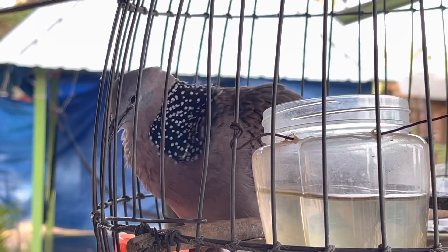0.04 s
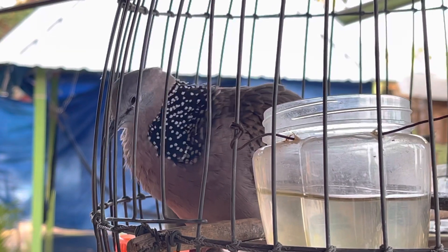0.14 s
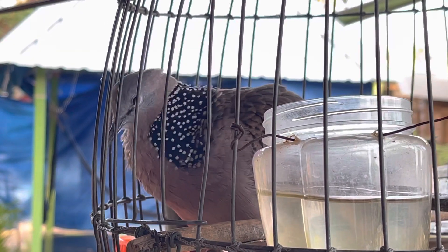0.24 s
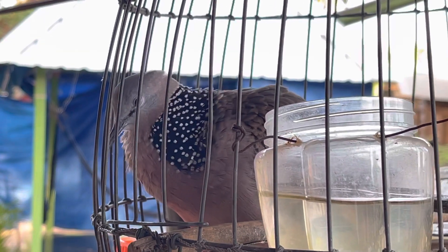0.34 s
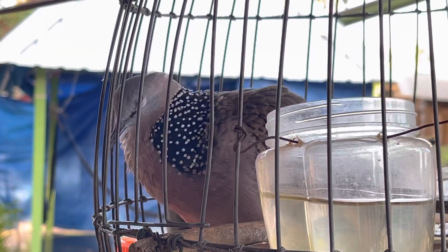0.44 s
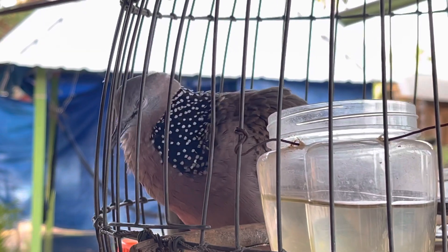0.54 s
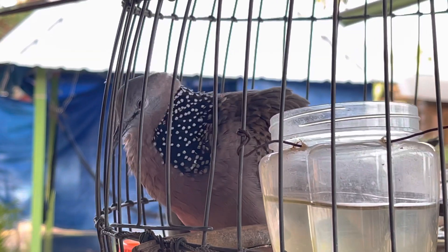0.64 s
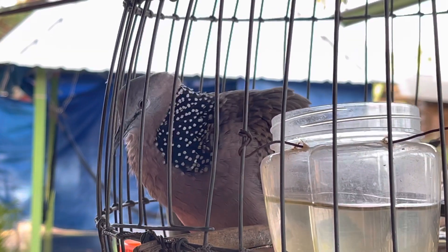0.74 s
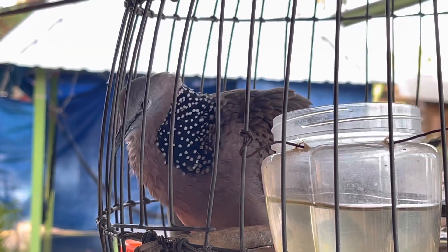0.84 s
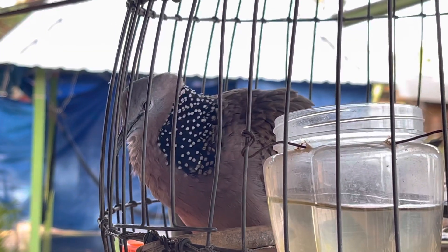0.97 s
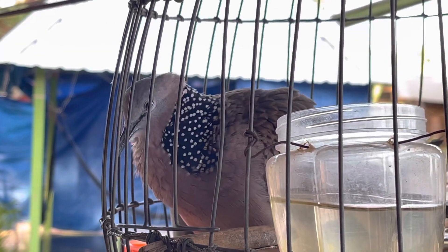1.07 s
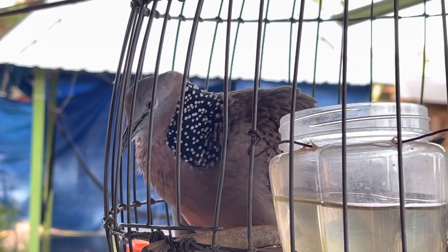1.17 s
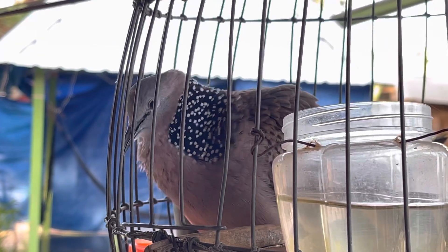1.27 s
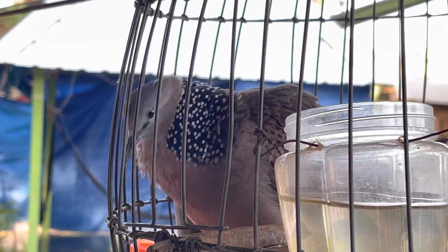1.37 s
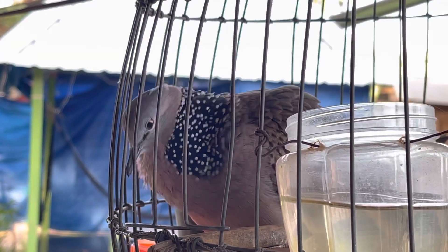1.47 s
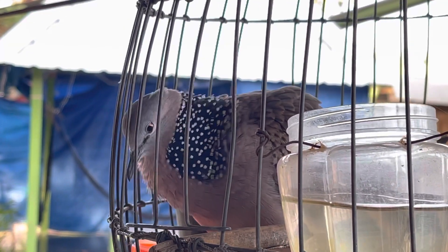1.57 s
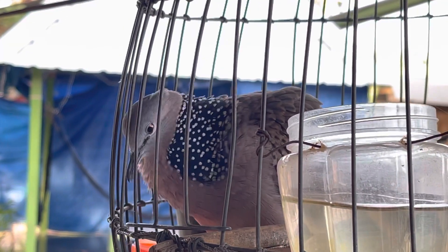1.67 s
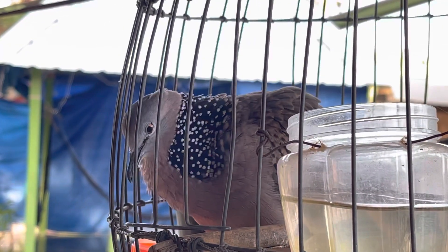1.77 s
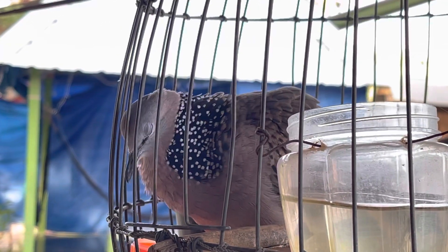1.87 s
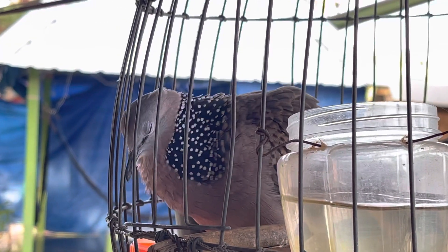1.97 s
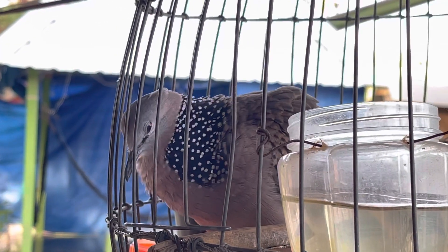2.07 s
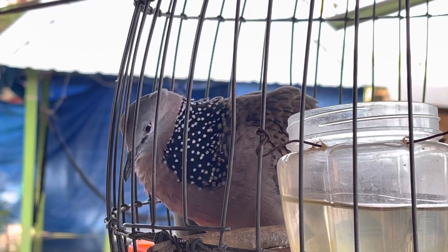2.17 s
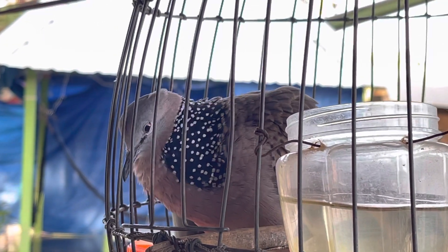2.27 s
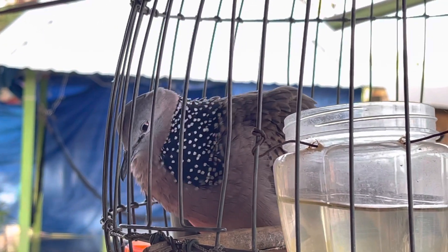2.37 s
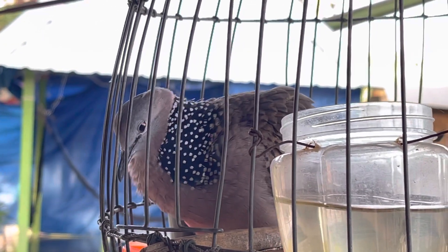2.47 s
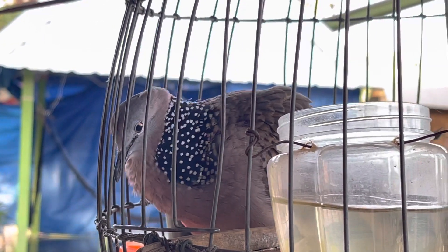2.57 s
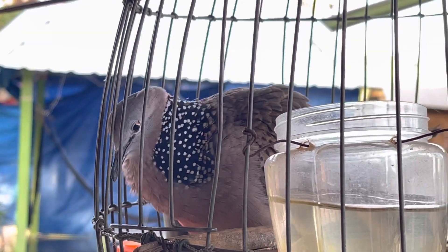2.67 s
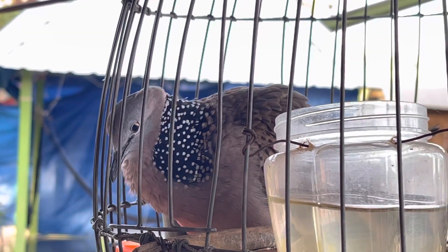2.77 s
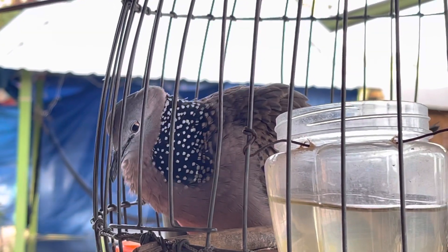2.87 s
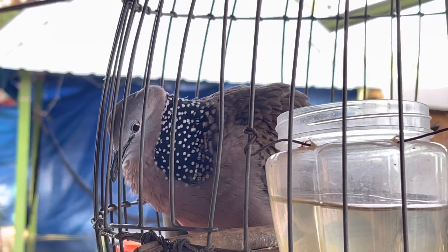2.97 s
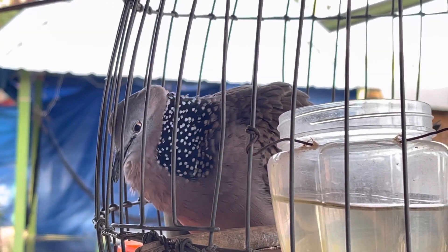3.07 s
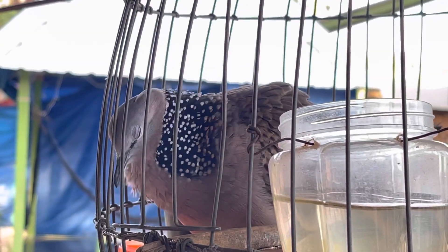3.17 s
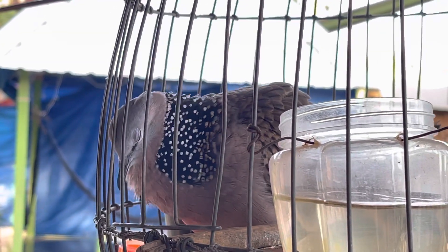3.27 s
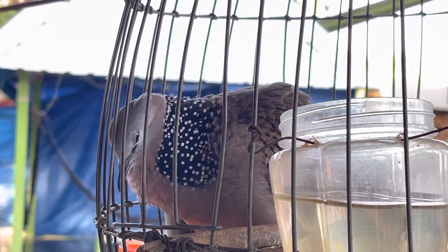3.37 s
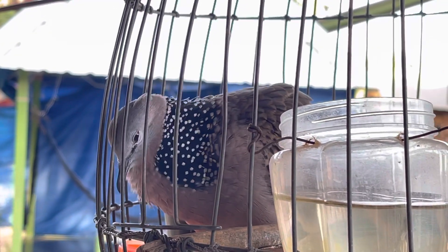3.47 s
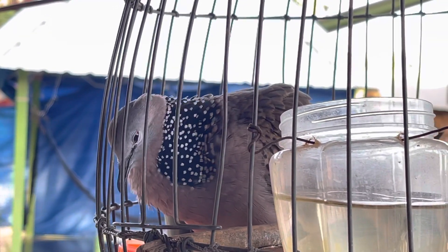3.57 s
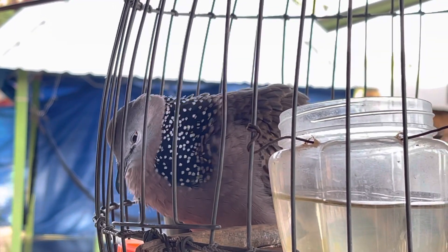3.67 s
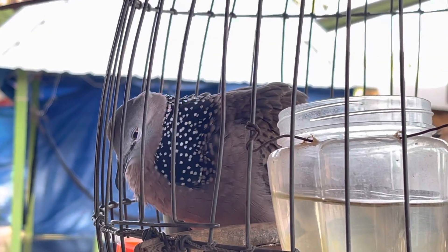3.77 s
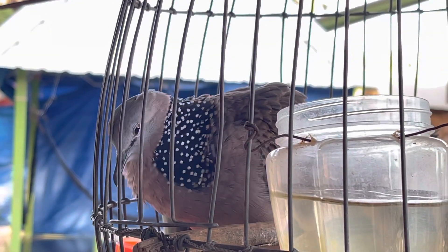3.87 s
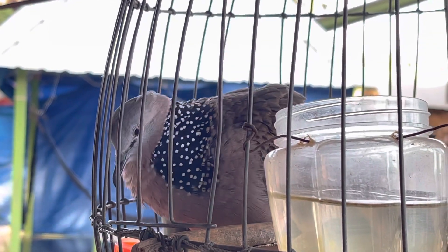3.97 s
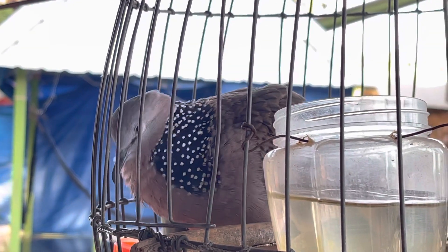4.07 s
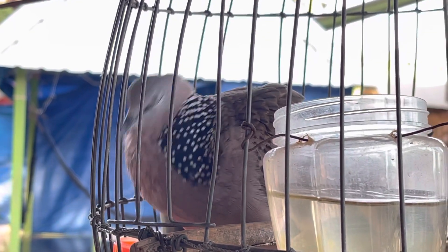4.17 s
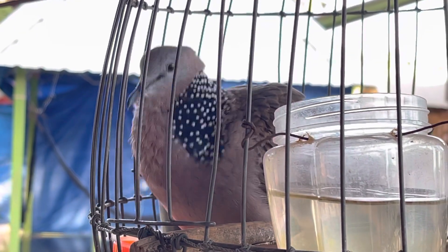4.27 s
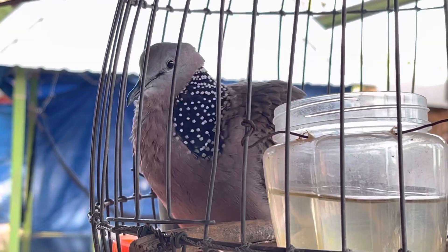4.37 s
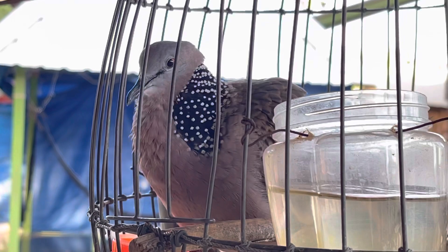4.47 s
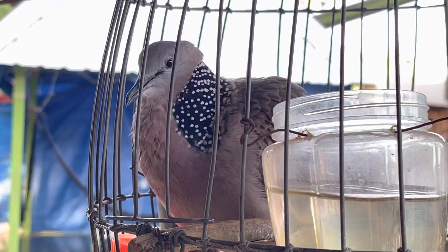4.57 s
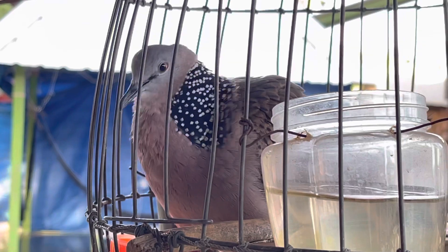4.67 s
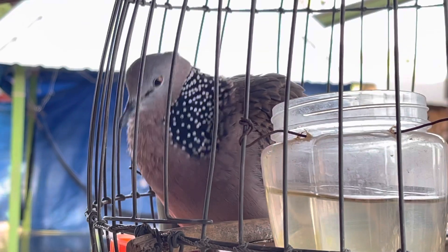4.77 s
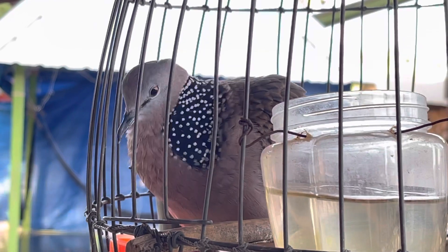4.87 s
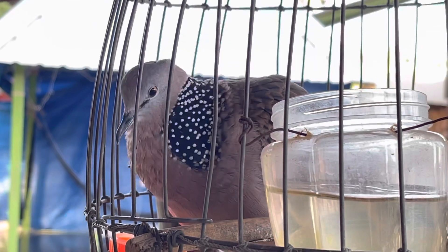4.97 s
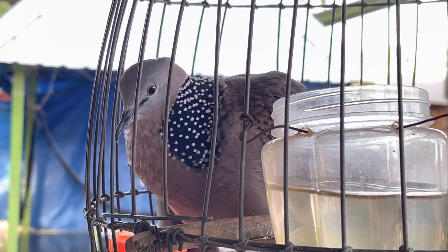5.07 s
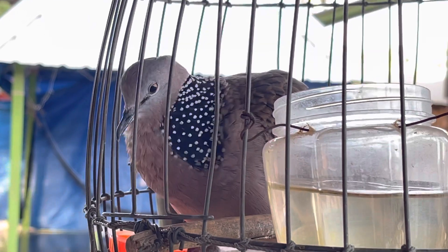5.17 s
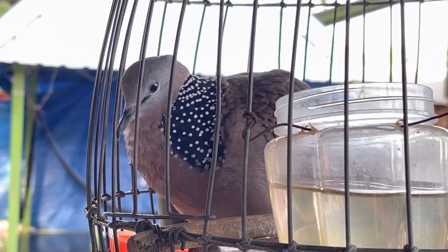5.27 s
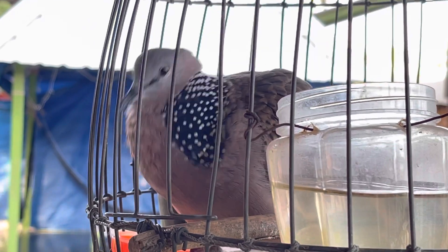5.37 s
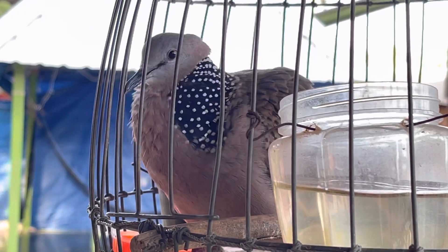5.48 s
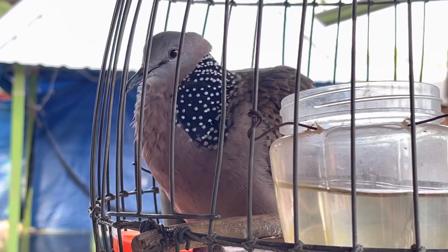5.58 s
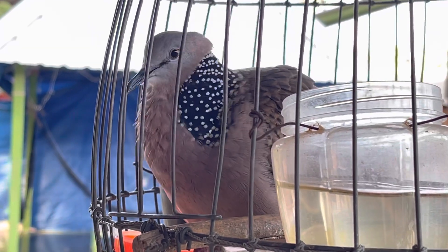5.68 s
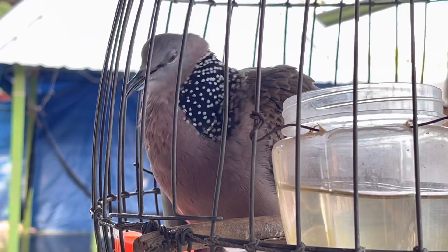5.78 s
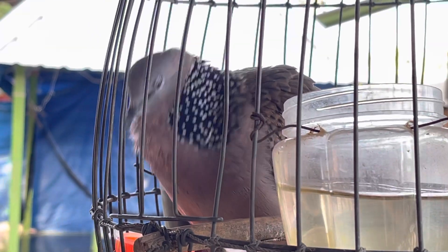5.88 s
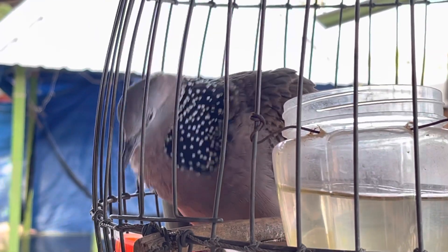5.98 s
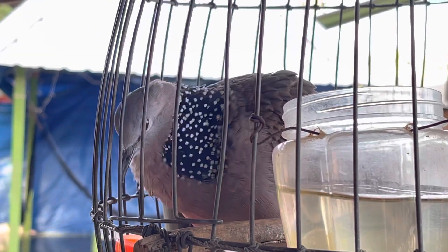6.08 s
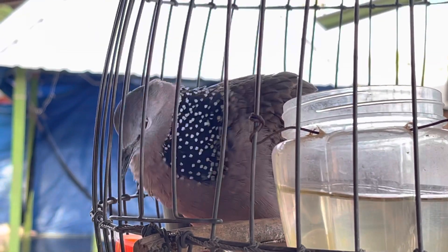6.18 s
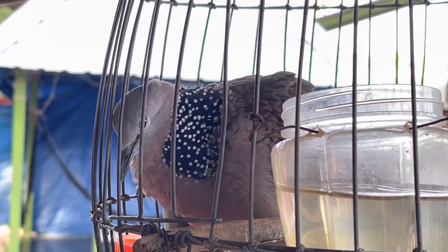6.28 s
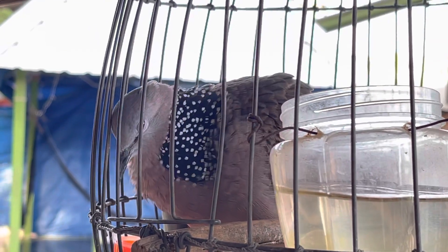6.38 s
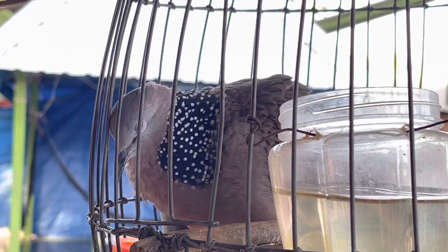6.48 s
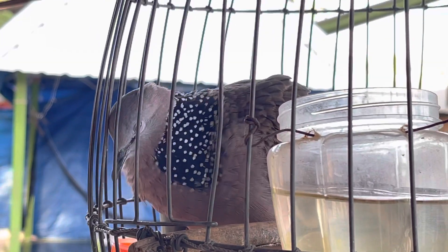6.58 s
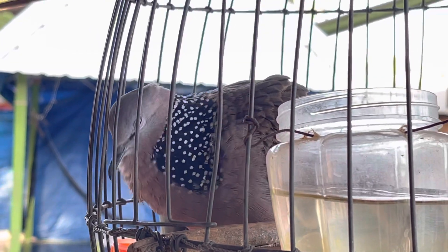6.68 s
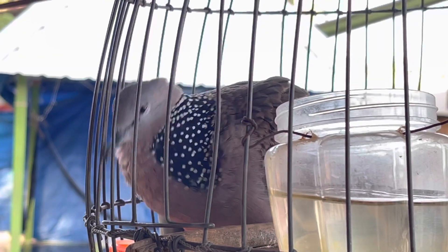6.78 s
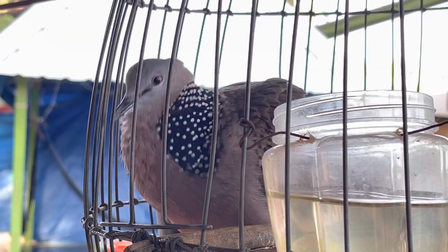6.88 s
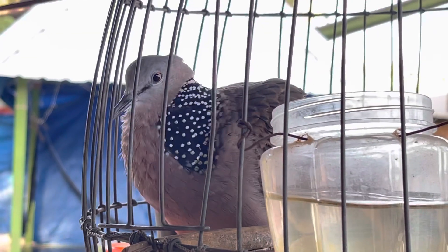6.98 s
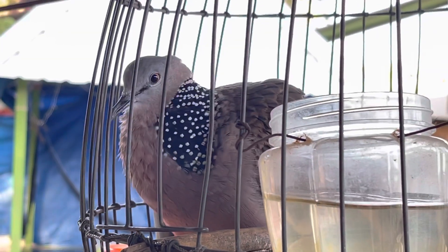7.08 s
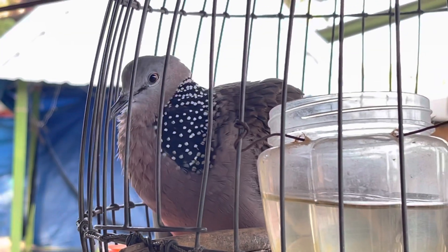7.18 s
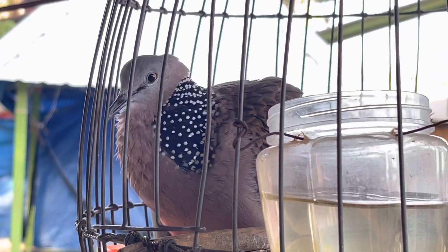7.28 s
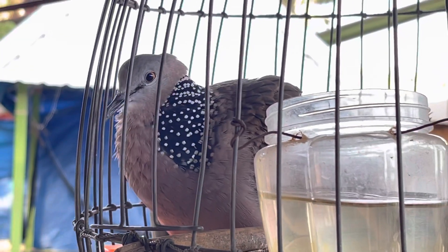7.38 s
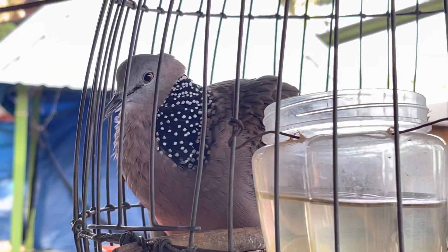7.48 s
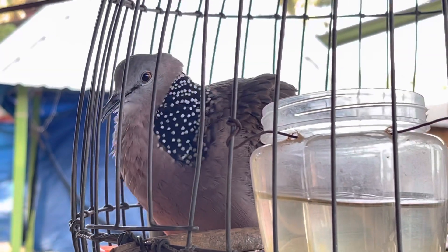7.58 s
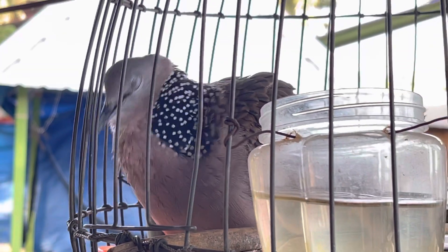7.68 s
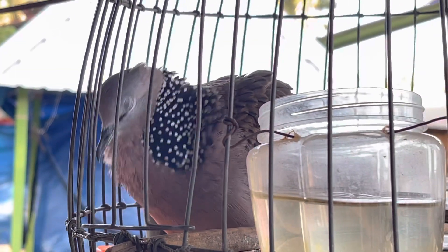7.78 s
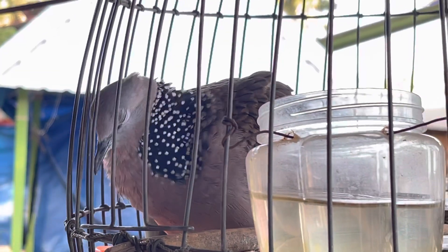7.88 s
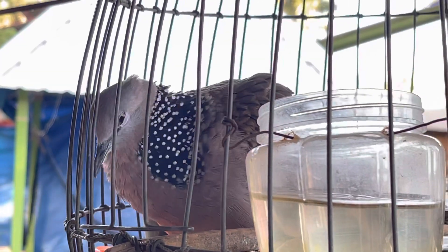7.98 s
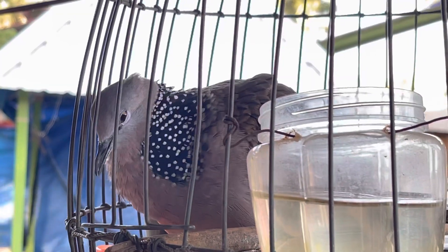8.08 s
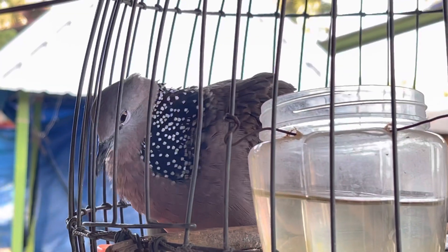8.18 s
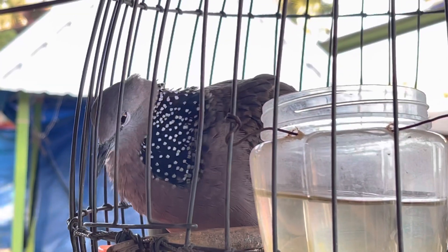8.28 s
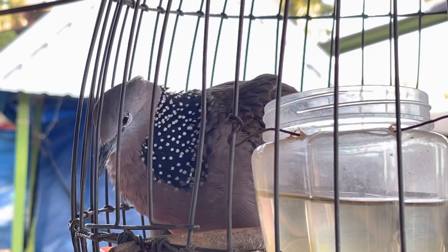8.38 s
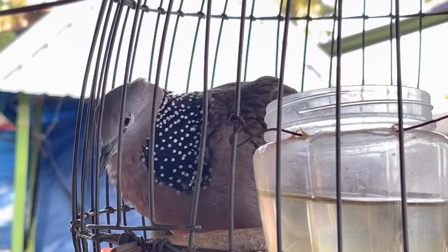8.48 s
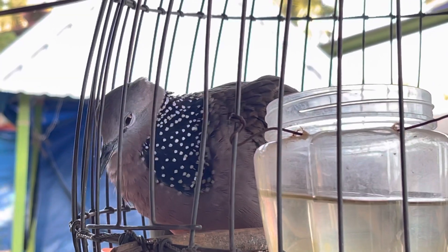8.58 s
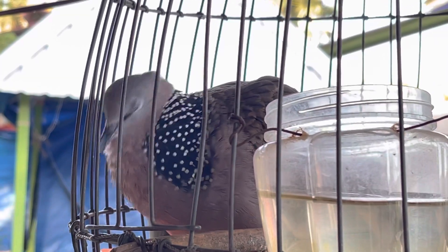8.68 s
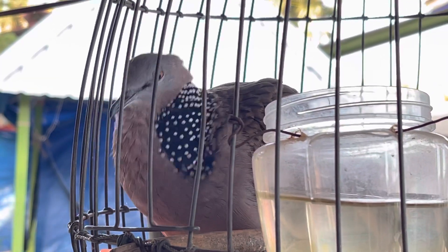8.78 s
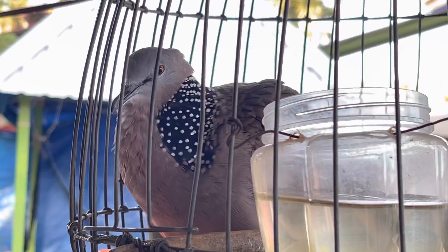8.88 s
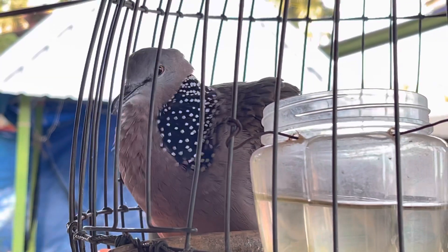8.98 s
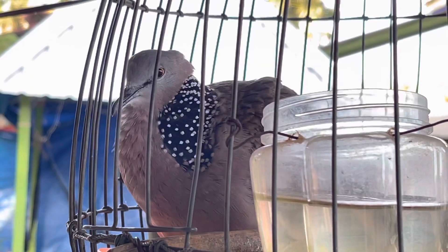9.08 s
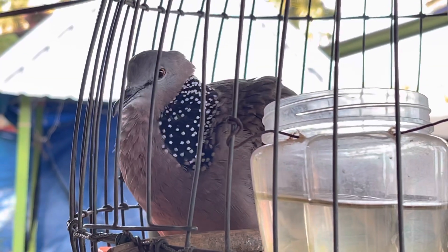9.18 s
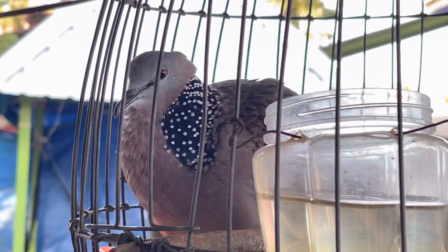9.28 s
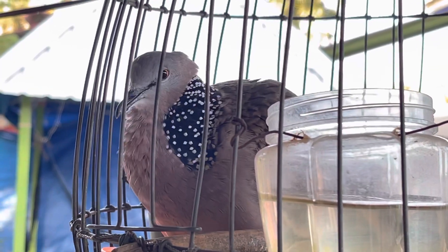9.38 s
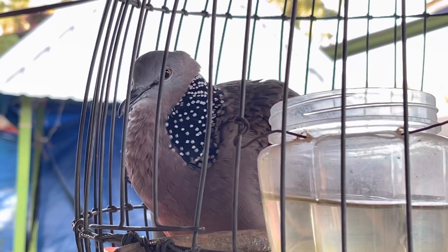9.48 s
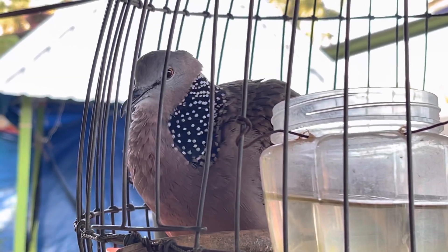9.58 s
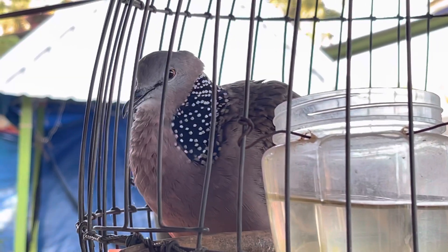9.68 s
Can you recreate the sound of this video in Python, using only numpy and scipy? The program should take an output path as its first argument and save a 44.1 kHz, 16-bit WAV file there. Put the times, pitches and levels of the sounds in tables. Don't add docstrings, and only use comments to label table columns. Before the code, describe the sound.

Throaty, fluttering dove coos repeat at close range outdoors, with soft leaf rustle, low engine rumble and a few dull wind thumps late on.

```python
import sys
import numpy as np
from scipy import signal
from scipy.fft import rfft, irfft, next_fast_len
from scipy.io import wavfile
from scipy.ndimage import uniform_filter1d

SR = 44100
rng = np.random.default_rng(int(sys.argv[2]) if len(sys.argv) > 2 else 0)


def log_audio(samples):
    frames = np.atleast_2d(samples).T
    limited = np.clip(frames, -1, 1)
    pcm = np.round(limited * 32767).astype(np.int16)
    wavfile.write(sys.argv[1], SR, pcm)


def gain_from_decibels(decibels):
    exponent = np.asarray(decibels, float) / 20
    return 10 ** exponent


N = 429534
T = np.arange(N) / SR
HZ = np.maximum(np.fft.rfftfreq(next_fast_len(N), 1 / SR), 1)

# (time [s], engine level [dB], wind level [dB])
RUMBLE = [(0.0, -52.5, -60), (2.2, -48.5, -59), (4.3, -53, -55), (5.5, -52, -57.5), (6.4, -50.5, -54.5),
          (7.3, -52.5, -41.5), (8.3, -52, -76), (8.7, -54, -48), (9.74, -48.5, -54.5)]


def on_hz(table, hz, axis=1):
    columns = np.array(table)
    return np.interp(np.log(hz), np.log(columns[:, 0]), columns[:, axis])


def curves(table):
    s, *columns = np.transpose(table)
    span = slice(int(max(s[0], 0) * SR), int(s[-1] * SR))
    return span, [np.interp(T[span], s, column) for column in columns]


def gains(table):
    return [gain_from_decibels(np.pad(db, (0, N - len(db)), "edge")) for db in curves(table)[1]]


def faded(x, s=.004):
    ramp = np.minimum(np.arange(len(x)), np.arange(len(x))[::-1]) / (s * SR)
    return x * np.minimum(ramp, 1)


def ring(x, hz, width_hz):
    r = np.exp(-np.pi * width_hz / SR)
    poles = [1, -2 * r * np.cos(2 * np.pi * hz / SR), r * r]
    return signal.lfilter([(1 - r * r) / 2, 0, (r * r - 1) / 2], poles, x)


def walk(rate):
    k = int(SR / rate)
    held = np.repeat(rng.standard_normal(N // k + 1), k)
    x = uniform_filter1d(uniform_filter1d(held, k), k)[:N]
    return x / x.std()


def wash(spectrum, flicker_db, rate, octaves):
    # (frequency [Hz], side minus mid [dB], share of side tied to mid [0-1], its lead [rad])
    ports = [(40, -11.5, .5, 2.0), (130, -11.5, .6, 2.8), (300, -9.5, .4, 2.5), (900, 1.5, .15, 1.5),
             (2500, -8, .5, 1.5), (4700, -11, .6, 1.5), (6200, -30, .7, 1.5), (8500, -14.5, .9, 1.5),
             (9300, -0.5, 0.93, 1.5), (10800, 3, 0.92, 1.5), (12000, -21.5, .95, 1.5)]
    size = next_fast_len(N)
    mid, other = rfft(rng.standard_normal((2, N)), size)
    like = np.clip(on_hz(ports, HZ, axis=2), 0, 1)
    tied = np.exp(1j * on_hz(ports, HZ, axis=3)) * like * mid
    side = gain_from_decibels(on_hz(ports, HZ)) * (tied + np.sqrt(1 - like ** 2) * other)
    inside = (HZ > spectrum[0][0]) & (HZ < spectrum[-1][0])
    pair = np.array([mid + side, mid - side]) * gain_from_decibels(on_hz(spectrum, HZ)) * inside
    band = (np.log2(HZ / spectrum[0][0]) / octaves).astype(int)
    out = np.zeros((2, N))
    for k in range(band[inside].max() + 1):
        out += irfft(pair * (band == k), size)[:, :N] * gain_from_decibels(flicker_db * walk(rate))
    return out / np.sqrt(np.mean(out.mean(axis=0) ** 2))


def placed(x, pan_db, lag):
    late = np.interp(np.arange(N) - lag, np.arange(N), x)
    return np.array([x * gain_from_decibels(pan_db / 2), late * gain_from_decibels(-pan_db / 2)])


def yard_air():
    # (frequency [Hz], level [dB per Hz])
    hush = [(120, -29), (200, -2), (474, -3.5), (586, -5), (1070, -9), (5630, -31.5), (8740, -15.5),
            (9800, -28.5), (12700, -51.5), (21600, -120)]
    return gain_from_decibels(-58) * wash(hush, 1.2, 7, 0.93)


def firing():
    # (time [s], firing rate [firings per s])
    speed = [(0, 18.9), (2, 18.9), (2.9, 18.5), (4.3, 18.3), (4.55, 19.6), (9.74, 19.7)]
    # (multiple of the firing rate, level [dB], loudest time [s], lasting [s])
    partials = [(2, -62, 1.2, 2), (3, -59.5, 1.5, 1.8), (3, -57.5, 4.0, 1.1), (4, -53.5, 1.4, 2.3),
                (4, -53, 6.2, 1.6), (5, -49, .2, .6), (5, -49.5, 2.1, 1), (5, -51.5, 3.7, 0.97),
                (5, -58, 6.3, 0.73), (6, -58.5, .2, .5), (6, -52.5, 2, 1), (6, -57.5, 3.6, 0.77),
                (7, -60, .3, .6), (7, -56, 2, 0.72), (7, -55.5, 3.5, 0.99), (8, -59.5, 0.46, 0.6),
                (9, -59, 0.33, 0.51)]
    rate = np.interp(T, *np.transpose(speed)) * (1 + 0.0028 * walk(3))
    phase = 2 * np.pi * np.cumsum(rate) / SR
    out = np.zeros(N)
    for k, db, s, lasting in partials:
        swell = np.exp(-((T - s) / lasting) ** 2)
        out += np.sqrt(2) * gain_from_decibels(db + 1.5 * walk(6)) * swell * np.sin(round(k) * phase + k * k)
    return out


def engine():
    # (frequency [Hz], level [dB per Hz])
    drone = [(25, -45), (50, -6), (90, -2), (125, -5.5), (170, -12.5), (320, -28)]
    level = gains(RUMBLE)[0]
    return level * wash(drone, 2.0, 8.0, .9) + placed(firing(), -1.5, 12)


def wind_thumps():
    # (time [s], level [dB], boom pitch [Hz])
    puffs = [
        (6.965, -29, 69),
        (7.034, -24.5, 75),
        (7.234, -22.5, 74),
        (8.446, -24.5, 101),
        (8.54, -26.5, 103.6),
        (8.863, -25.5, 104),
        (8.966, -22, 110),
        (9.03, -23.5, 100),
        (9.056, -25.5, 85.1),
        (9.391, -30, 79),
    ]
    # (start [s], length [s], level [dB])
    buffets = [
        (6.262, 0.11, -50),
        (6.944, 0.15, -60.5),
        (8.411, 0.097, -48),
        (8.722, 0.14, -52),
        (8.861, 0.062, -47),
        (8.934, 0.203, -46),
        (9.125, 0.45, -53),
        (9.55, 0.26, -56.5),
    ]
    out = np.zeros(N)
    for s, db, hz in puffs:
        span = slice(int(s * SR), int((s + 3 / hz) * SR))
        after = T[span] - s
        boom = np.exp(-1.6 * hz * after) * np.sin(2 * np.pi * hz * after)
        out[span] += gain_from_decibels(db) * boom * np.minimum(after / 0.0048, 1)
    push = np.zeros(N)
    for s, length, db in buffets:
        push += gain_from_decibels(db) * np.clip(1 - (2 * (T - s) / length - 1) ** 4, 0, 1)
    turbulence = rng.standard_normal(N)
    for _ in range(3):
        turbulence = ring(turbulence, 120, 280)
    return out + gain_from_decibels(16.5 + 4.85 * walk(45)) * push * turbulence


def wind():
    level = gains(RUMBLE)[1]
    gusts = wash([(20, -28.5), (40, -6.0), (55, -9.0), (75, -8.5), (120, -26.5)], 2.5, 2.0, 0.98)
    return gain_from_decibels(-2.0) * level * gusts + placed(wind_thumps(), -1.0, 14)


def rustle():
    # (frequency [Hz], level [dB per Hz])
    leaves = [(1100, -10.5), (2250, -3.5), (4000, -8.5), (7300, -8.5), (8600, -4.5), (10300, -6),
              (11500, -7.5), (12100, -18.5), (12700, -32.5)]
    # (time [s], level [dB])
    breeze = [(0.0, -59.5), (0.78, -67), (0.9, -59.5), (2.9, -58), (3.39, -60.5), (4.04, -60.5),
              (5.6, -64.5), (6.3, -66), (6.8, -65), (7.3, -63), (7.9, -54.5), (9.74, -61.5)]
    # (time [s], level [dB], darker part over that [dB], held [s])
    shakes = [(0.54, -48, -29, 0.1), (0.81, -36.5, -30, 0.02), (1.0992, -47.5, -32, 0.18),
              (1.63, -57, -21.5, 0.1), (2.049, -55.5, -6, 0.22), (2.6689, -51.5, -7, 0.029),
              (2.841, -43, -2.5, 0.033), (3.405, -40, -10, 0.12), (4.6, -60, -1, 0.46),
              (5.529, -48, -20, 0.017), (5.871, -55, -0.5, 0.083), (6.93, -51, -26, 0.053),
              (7.0684, -49.5, -23, 0.061), (7.539, -53, -21.5, 0.1)]
    bright, dark = gain_from_decibels(-2.0) * gains(breeze)[0], np.zeros(N)
    for s, db, darker_db, held in shakes:
        dying = np.maximum(np.maximum(T - s, 0) - held, 0)
        t60_s = 0.23 + 5.1 * held
        fall = (T > s) * np.exp(-np.log(1000) * dying / t60_s)
        bright += gain_from_decibels(db - 16.0) * fall
        dark += gain_from_decibels(db + darker_db - 5.5) * fall
    grain = gain_from_decibels(1.2 * walk(30) + 0.75 * walk(200))
    hiss = bright * wash(leaves, 0.58, 6.2, 1.0)
    flap = dark * wash([(1300, -17.0), (2300, -2.0), (4000, -12.0)], 1.3, 12, 0.47)
    return grain * (hiss + flap)


def whistles(tables, closing, wobble):
    out = np.zeros(N)
    for table in tables:
        span, (hz, db, *depth) = curves(table)
        shut = np.clip(depth[0] if depth else .4, 0, 1) * closing[span]
        tone = np.sin(2 * np.pi * np.cumsum(hz * (1 - wobble * shut)) / SR)
        out[span] += faded(np.sqrt(2) * gain_from_decibels(db) * (1 - shut) * tone, 0.0074)
    return out * gain_from_decibels(0.74 * walk(27))


def songbirds():
    # (start [s], length [s], first pitch [Hz], level [dB])
    chirps = [
        (5.339, 0.12, 2590, -63.5),
        (5.629, 0.032, 2570, -59),
        (5.868, 0.054, 2330, -55.5),
        (6.108, 0.072, 1830, -59.5),
        (6.352, 0.094, 2080, -62.5),
        (6.6, 0.08, 1840, -61.5),
        (6.894, 0.046, 2500, -64),
    ]
    # (start [s], length [s], first pitch [Hz], last pitch [Hz], level [dB])
    peeps = [(6.76, .05, 5400, 4600, -68), (5.75, .4, 1505, 1500, -64), (1.2, .46, 1440, 1395, -66),
             (7.16, .22, 1700, 1698, -68), (5.89, .09, 3660, 3650, -65), (5.89, .13, 4280, 4200, -69),
             (5.82, .04, 2270, 2240, -66), (2.78, .06, 5600, 5550, -70), (8.88, .06, 5250, 5150, -70),
             (4.24, .05, 3700, 3690, -69), (4.7, .13, 1930, 1925, -66), (5.45, .07, 5000, 5250, -71),
             (4.0, .06, 5250, 5240, -71)]
    top_hz = 2654
    calls = []
    for s, length, hz, db in chirps:
        calls.append([(s, hz, db - 2), (s + 0.43 * length, top_hz, db), (s + length, 0.96 * top_hz, db - 2)])
    for s, length, hz, end_hz, db in peeps:
        calls.append([(s, hz, db - 2.0), (s + length / 2, (hz + end_hz) / 2, db), (s + length, end_hz, db)])
    flutter = np.cos(np.pi * np.cumsum(45 * (1 + 0.22 * walk(25))) / SR) ** 4
    return whistles(calls, flutter, 0.04)


def neighbours():
    # (time [s], pitch [Hz], level [dB], flutter [0-1])
    calls = [
        [(0, 754, -27, 0), (.052, 670, -39, 0.08)],
        [(.43, 693.6, -44.5, 0.94), (.55, 688.7, -35.5, 1.2), (.66, 652, -33.5, 0.83), (.68, 570, -64, 1.2)],
        [(.69, 690, -53, 0.1), (.74, 700, -31.5, 0), (.8, 586.5, -40.5, 0.43), (.85, 547, -42, 0.7),
         (.88, 482, -51, 0.76)],
        [(1.06, 465, -45, 0.76), (1.085, 562, -36, 0.57), (1.115, 699, -35, 0.63), (1.16, 721, -33.5, 0),
         (1.215, 715, -36.5, 1), (1.24, 659, -34.5, 0.8), (1.285, 430, -44, 0.77)],
        [(9.19, 590, -67, 0.18), (9.38, 574, -58, 0), (9.46, 570, -73, 0.17)],
        [(9.58, 570, -62.5, 0), (9.63, 587, -57.5, 0.05), (9.74, 592, -61.5, 0.26)],
    ]
    catches = [0.471, .495, .517, 0.544, .57, .597, .618, .642, .667, .765, .785, .806, 0.827, .856, 1.088,
               1.1, 1.113, 1.222, 1.244, 1.27]
    closing, shut = np.zeros(N), np.hanning(int(.012 * SR))
    for s in catches:
        closing[int(s * SR) - len(shut) // 2:][:len(shut)] = shut
    return whistles(calls, closing, 0.33)


def long_coos():
    # (start [s], length [s], held effort [dB], swell towards the end [dB])
    calls = [
        (0.051, 0.37, -7, 0.5),
        (1.787, 0.4, -8, 2),
        (3.602, 0.39, -9, 1.6),
        (6.286, 0.393, -9, 1.3),
        (8.133, 0.41, -9.5, 3.5),
    ]
    top_pitch = [708, 699, 696, 693, 695]
    # (time after the start [s], share of top pitch, effort over the hold [dB])
    scoop = [(0, 0.69, -11.5), (0.016, 0.74, -11.5), (0.023, .91, 0.5), (0.04, 0.985, 0), (0.055, 1, 0)]
    # (time after the end [s], share of top pitch, effort over the swell [dB])
    drop_off = [(0, .9, 0), (.003, .76, -17.5), (.012, .66, -20.5), (0.026, 0.56, -28.5)]
    out = []
    for (s, length, db, swell_db), hz in zip(calls, top_pitch):
        end, end_db = s + length, db + swell_db
        rise = [(s + dt, hz * share, db + d) for dt, share, d in scoop]
        middle = [(s + .56 * length, .98 * hz, db), (s + .87 * length, .937 * hz, end_db)]
        fall = [(end + dt, hz * share, end_db + d) for dt, share, d in drop_off]
        out.append(rise + middle + fall)
    return out


def short_coos():
    # (start [s], length [s], first hump length [s], low pitch [Hz], second climb [s])
    calls = [
        (1.304, 0.28, 0.06, 453, 0.077),
        (3.115, 0.28, 0.06, 442.2, 0.089),
        (5.789, 0.2913, .064, 449, 0.087),
        (7.654, 0.28, 0.057, 457.9, 0.076),
    ]
    hump_lift = [1.0, 1.0, 0.97, .93]
    # (share of its length, pitch [Hz], effort [dB])
    first_hump = [(0, 428.5, -28.5), (.16, 456.6, -18), (0.681, 650, -8), (.95, 596, -12.5)]
    # (time after the end [s], pitch [Hz], effort [dB])
    last_hump = [(-.038, 650.7, -7), (-.009, 622.5, -8), (-.004, 488, -20.5), (.006, 450, -19.5),
                 (0.019, 368, -29.5)]
    low_db = -22
    out = []
    for (s, length, hump_s, hz, climb_s), lift in zip(calls, hump_lift):
        end = s + length
        first = [(s + share * hump_s, f * lift, d) for share, f, d in first_hump]
        low = [(s + hump_s + 0.018, hz, low_db), (end + last_hump[0][0] - climb_s, hz, low_db)]
        last = [(end + dt, f, d) for dt, f, d in last_hump]
        out.append(first + low + last)
    return out


def coos():
    # (time [s], pitch [Hz], effort [dB])
    hurried = [
        [(4.66, 404, -29.5), (4.669, 466, -17), (4.707, 681, -5), (4.747, 554, -15.5), (4.822, 660, -7),
         (4.85, 642.5, -6.5), (4.864, 563, -19), (4.868, 483, -22.5), (4.884, 430, -33.5)],
        [(4.967, 495, -18.5), (5.009, 629, -7), (5.046, 654.5, -9.5), (5.115, 658.6, -4), (5.144, 600, -10),
         (5.165, 649, -6.5), (5.193, 570, -12.5), (5.254, 511, -18), (5.275, 420, -38.5)],
    ]
    return list(hurried) + long_coos() + short_coos()


def stutters():
    # (time [s], closure [0-1], share of a cycle lost)
    early = [(0.089, 0.83, 0.55), (0.11, 0.2, 0.43), (0.125, 0.95, 1), (0.141, 1, 0.37), (0.156, 0.83, 0.9),
             (0.174, 0.3, 0.42), (0.186, 1, 0.45), (0.199, 0.98, 0.65), (0.214, 0.8, 0.92),
             (0.222, 0.2, 0.62), (0.232, 0.9, 0.76), (0.243, 0.82, 0.75), (0.253, 0.9, 0.76),
             (0.263, 0.6, 0.69), (0.274, 1, 0.99), (0.285, 0.7, 0.82), (0.322, 0.6, 0.62),
             (0.335, 0.73, 0.76), (0.343, 0.75, 0.8), (0.36, 0.75, 0.81), (0.37, 0.92, 0.79),
             (0.379, 0.9, 0.77), (1.802, 0.8, 0.76), (1.82, 0.97, 0.55), (1.839, 0.95, 0.6),
             (1.854, 0.9, 0.6), (1.872, 0.5, 0.6), (1.885, 0.48, 0.82), (1.9, 0.8, 0.92), (1.912, 1, 0.47),
             (2.03, 0.7, 0.76), (3.617, 0.6, 0.65), (3.639, 0.95, 0.97), (3.657, 0.78, 0.89),
             (3.676, 0.9, 0.69), (3.691, 0.5, 0.78), (3.705, 0.58, 0.91), (3.719, 0.7, 0.6),
             (3.73, 0.9, 0.49), (3.744, 0.5, 0.69), (3.782, 0.7, 0.81), (3.794, 0.9, 0.78),
             (3.815, 0.6, 0.74), (3.862, 0.8, 0.72), (3.909, 0.7, 0.62), (3.92, 0.7, 0.79)]
    # (time [s], closure [0-1], share of a cycle lost)
    late = [(6.3, 0.36, 0.56), (6.32, 0.8, 0.69), (6.336, 0.82, 0.68), (6.354, 0.81, 0.96),
            (6.373, 0.9, 0.97), (6.385, 0.6, 0.7), (6.4, 0.49, 0.7), (6.423, 0.86, 1), (6.455, 1, 0.47),
            (6.466, 0.79, 0.83), (6.489, 0.35, 0.7), (6.545, 0.81, 0.76), (6.555, 0.85, 0.83),
            (6.567, 0.94, 0.48), (6.575, 0.85, 0.81), (6.606, 0.6, 0.64), (8.153, 0.22, 0.42),
            (8.173, 1, 1), (8.192, 0.32, 0.6), (8.208, 0.62, 0.76), (8.223, 0.23, 0.62), (8.251, 0.7, 0.92),
            (8.263, 0.79, 0.94), (8.286, 0.98, 0.41), (8.295, 0.65, 0.82), (8.307, 0.81, 0.85),
            (8.32, 0.83, 0.91), (8.329, 0.7, 0.81), (8.341, 0.48, 0.87), (8.37, 0.18, 0.13),
            (8.437, 0.95, 0.65), (8.474, 0.74, 0.72)]
    # (time [s], closure [0-1], share of a cycle lost)
    short = [(1.351, 0.83, 0.53), (1.364, 0.65, 0.58), (1.512, 0.26, 0.34), (1.522, 0.82, 0.23),
             (1.535, 0.48, 0.57), (3.163, 0.31, 0.1), (3.187, 0.47, 0.51), (3.313, 0.52, 0.52),
             (3.321, 0.51, 0.34), (3.333, 0.94, 0.52), (3.346, 1, 0.54), (4.719, 0.48, 0.39),
             (4.727, 0.606, 0.54), (4.745, 0.6, 0.36), (4.766, 0.55, 0.54), (4.774, 0.37, 0.5),
             (4.785, 0.66, 0.3), (4.795, 0.41, 0.65), (4.806, 0.94, 0.39), (4.857, 0.53, 0.75),
             (4.974, 0.66, 0.51), (4.988, 0.6, 0.33), (5.014, 0.94, 0.35), (5.025, 0.79, 0.62),
             (5.035, 0.98, 0.48), (5.055, 0.48, 0.55), (5.134, 0.65, 0.52), (5.146, 0.81, 0.76),
             (5.172, 0.9, 0.58), (5.18, 0.85, 0.44), (5.208, 0.3, 0.2), (5.234, 1, 0.8),
             (5.826, 0.85, 0.57), (5.838, 1, 0.43), (5.853, 0.53, 0.44), (6.011, 0.4, 0.4),
             (6.024, 0.37, 0.43), (7.694, 0.32, 0.26), (7.703, 0.35, 0.17), (7.855, 0.36, 0.45),
             (7.866, 0.31, 0.29), (7.879, 0.45, 0.53)]
    # (closure [0-1], beat times [s])
    purrs = [
        (1, [1.391, 1.404, 1.42, 1.433, 1.445, 1.459, 1.473, 1.484, 1.497]),
        (0.7, [3.198, 3.213, 3.226, 3.245, 3.253, 3.27, 3.283, 3.296]),
        (.7, [5.866, 5.878, 5.891, 5.91, 5.924, 5.937, 5.951, 5.963, 5.975, 5.986, 6.0]),
        (0.8, [7.731, 7.744, 7.76, 7.773, 7.785, 7.8, 7.816, 7.83, 7.839]),
    ]
    closings = [(s, 0.0073, closure, lost) for s, closure, lost in early + late + short]
    closings += [(s, 0.0069, closure, 0.13) for closure, beats in purrs for s in beats]
    opening, drag = np.ones(N), np.zeros(N)
    slow = np.hanning(int(0.006 * SR))
    burst = np.hanning(int(0.0058 * SR))
    for s, length, closure, lost in closings:
        i, close = int(s * SR), np.hanning(int(length * SR))
        opening[i - len(close) // 2:][:len(close)] *= 1 - np.clip(closure, 0, 1) * close
        opening[i + len(close) // 3:][:len(burst)] *= 1 + 0.27 * burst
        drag[i - len(slow) // 2:][:len(slow)] += lost * slow / slow.sum()
    return opening, drag


def membrane_buzz(hz, db, tremble, waver):
    # (frequency [Hz], level [dB])
    overtones = [(850, -63), (1050, -51), (1220, -64.5), (1400, -63), (2000, -69.5), (3600, -78),
                 (5000, -72.5), (5600, -68.5), (6300, -71.5), (7000, -86), (8600, -78.5)]
    even = 2 * np.pi * np.cumsum(uniform_filter1d(hz, size=900) * (1 + .007 * tremble)) / SR
    glide = uniform_filter1d(np.gradient(hz) * SR, 600) / 750
    steady = (1 + glide ** 2) ** -0.6 * gain_from_decibels(.8 * np.minimum(db + 11.0, 0))
    buzz = np.zeros(len(hz))
    for k in range(2, 14):
        coming = gain_from_decibels(2.0 * waver[4000 * k:][:len(hz)])
        tone = gain_from_decibels(on_hz(overtones, k * hz)) * np.sin(k * even) * coming
        buzz += tone * steady if k > 2 else tone
    return buzz


def crop_and_throat(voice):
    crop = ring(voice, 570, 94.4)
    crop = crop - gain_from_decibels(3.5) * ring(crop, 806, 70)
    skin = signal.butter(2, 980, fs=SR, output="sos")
    return signal.sosfiltfilt(skin, crop)


def breath(voice, opening):
    flow = uniform_filter1d(np.abs(voice), size=400) * (0.54 + 3 * np.maximum(1 - opening, 0))
    return gain_from_decibels(-26.5) * ring(flow * rng.standard_normal(N), 960, 180)


def dove():
    opening, drag = stutters()
    voice, leak = np.zeros(N), np.zeros(N)
    tremble, waver = walk(150), walk(21)
    for coo in coos():
        span, (hz, db) = curves(coo)
        waver = np.roll(waver, 30000)
        phase = 2 * np.pi * np.cumsum(hz * (1 + 0.0087 * tremble[span]) / SR)
        tone = np.sin(phase - 2 * np.pi * np.cumsum(drag[span]))
        voice[span] = faded(np.sqrt(2) * gain_from_decibels(db) * opening[span] * tone)
        buzz = membrane_buzz(hz, db, tremble[span], waver)
        level = gain_from_decibels(0.099 * (db + 14.0)) * (0.25 + 1.1 * opening[span])
        leak[span] = faded(level * gain_from_decibels(2.0 * tremble[span]) * buzz)
    return breath(voice, opening) + crop_and_throat(voice), leak


def echoes(x):
    # (delay [s], level [dB])
    copies = [
        (.022, -34.5),
        (.045, -34),
        (.075, -36.5),
        (.12, -42),
        (.15, -44),
        (.19, -47),
        (.23, -48.5),
    ]
    voice_hz = 655
    after = T[:SR // 2]
    decay = np.exp(-np.log(1000) * after / 0.52)
    tail = gain_from_decibels(-54) * rng.standard_normal((2, len(after))) * decay * (after > .015)
    probe = np.exp(2j * np.pi * voice_hz * T[:1000])
    for s, db in copies:
        smear = rng.standard_normal((2, len(probe))) * np.hanning(len(probe))
        power = np.abs(smear @ probe) ** 2 / 2 + (smear ** 2).sum(axis=1) / 2
        smear /= np.sqrt(power)[:, None]
        tail[:, int(s * SR) - len(probe) // 2:][:, :len(probe)] += gain_from_decibels(db) * smear
    returned = signal.fftconvolve(ring(x, voice_hz, 260)[None], tail, axes=1)[:, :N]
    return returned * gain_from_decibels(2.2 * walk(35))


def scene():
    background = yard_air() + engine() + wind() + rustle()
    small, far = songbirds(), neighbours()
    near, buzz = dove()
    upper = ring(near, 665, 280)
    close = placed(upper, 2.2, 3) + placed(near - upper, -1.2, 3) + buzz
    distant = placed(far, 1.1, 1.5) + placed(small, .4, .6)
    small_echo = gain_from_decibels(-11.5) * np.roll(placed(small, -1, 0), 3500, axis=1)
    return background + distant + close + echoes(near + gain_from_decibels(20.5) * far) + small_echo


def low_pass(x):
    return signal.sosfilt(signal.butter(12, 13070, fs=SR, output="sos"), x)


def record(dry):
    mid, side = (dry[0] + dry[1]) / 2, (dry[0] - dry[1]) / 2
    notch_hz, notch_width_hz = 10230, 780
    mid = signal.filtfilt(*signal.iirnotch(notch_hz, notch_hz / notch_width_hz, SR), mid)
    top = signal.butter(8, 11700, fs=SR, output="sos")
    bass = signal.butter(2, 32, "high", fs=SR, output="sos")
    mix = signal.sosfilt(np.vstack([top, bass]), [mid + side, mid - side])
    return low_pass(mix)


dry = scene()
out = record(dry)
log_audio(out)
```